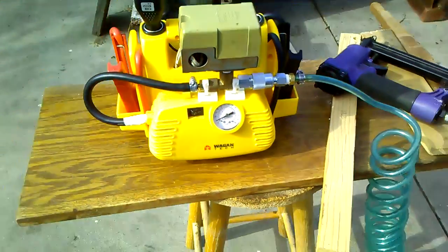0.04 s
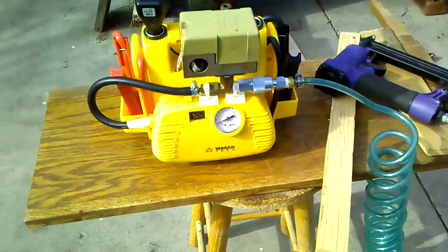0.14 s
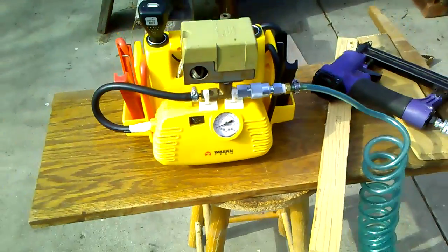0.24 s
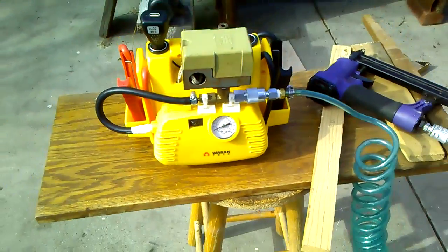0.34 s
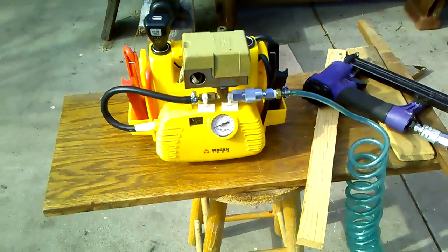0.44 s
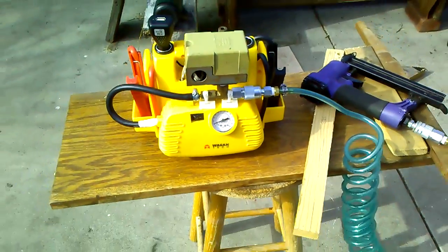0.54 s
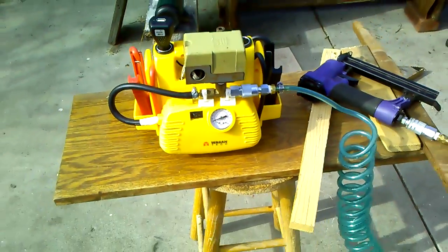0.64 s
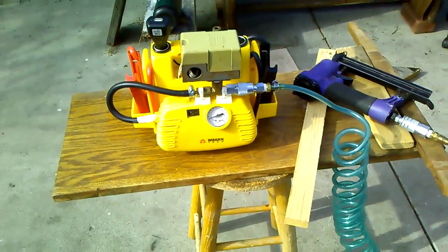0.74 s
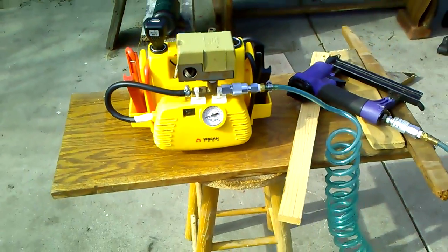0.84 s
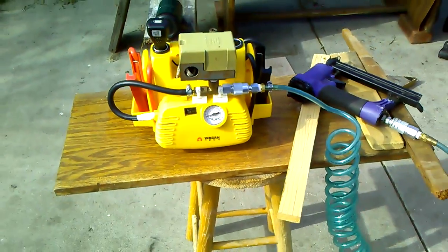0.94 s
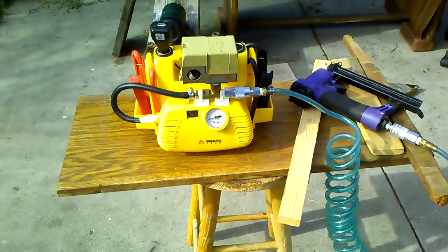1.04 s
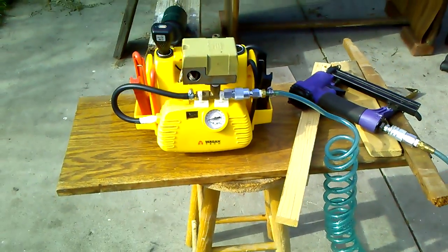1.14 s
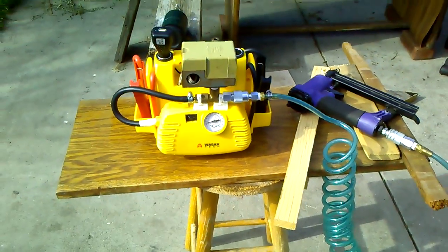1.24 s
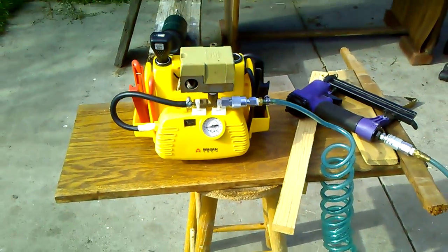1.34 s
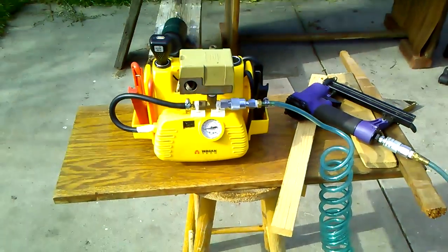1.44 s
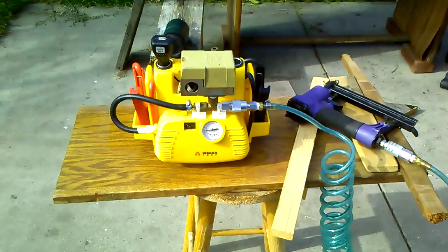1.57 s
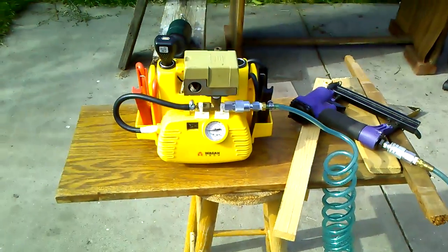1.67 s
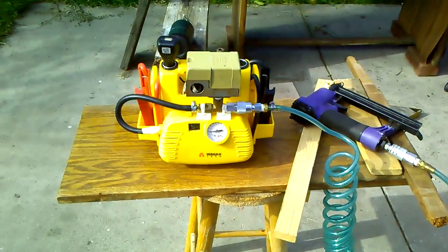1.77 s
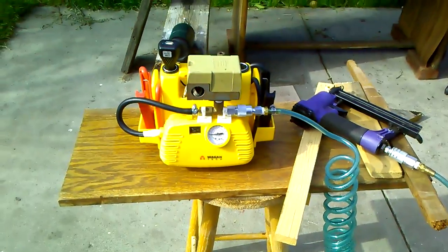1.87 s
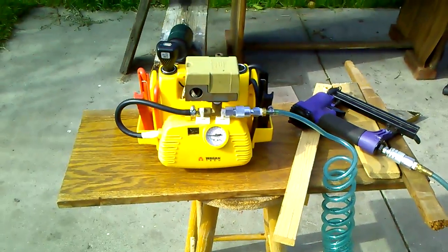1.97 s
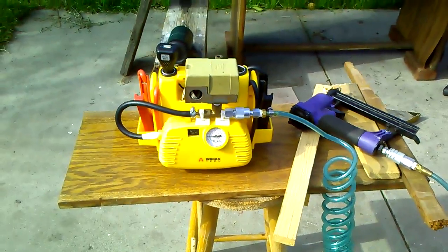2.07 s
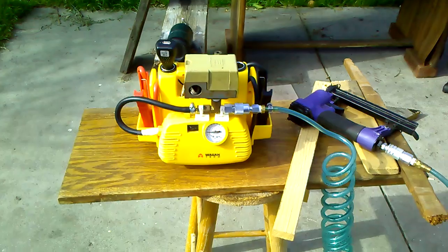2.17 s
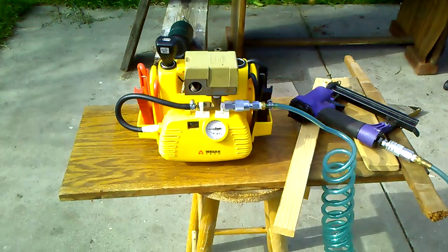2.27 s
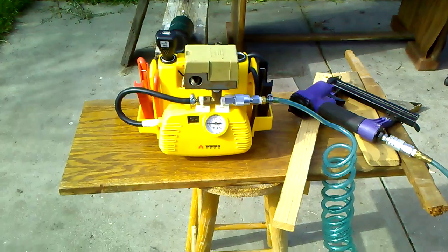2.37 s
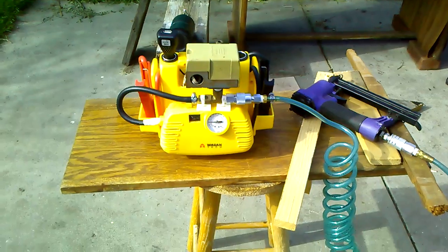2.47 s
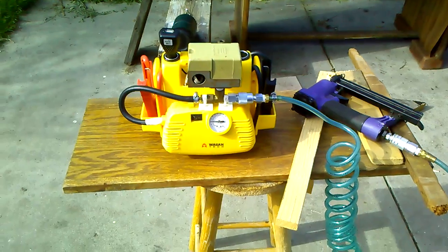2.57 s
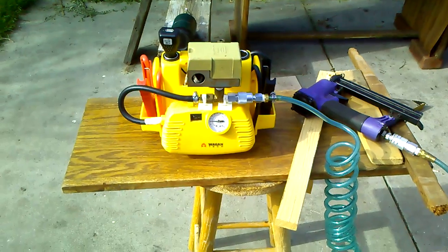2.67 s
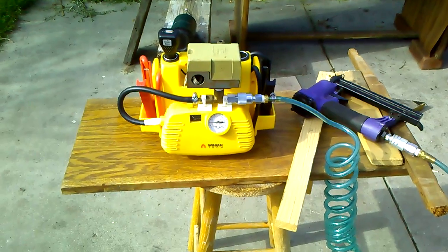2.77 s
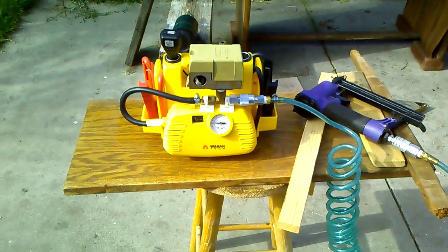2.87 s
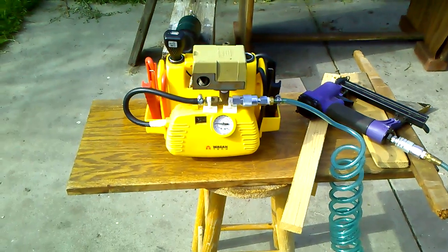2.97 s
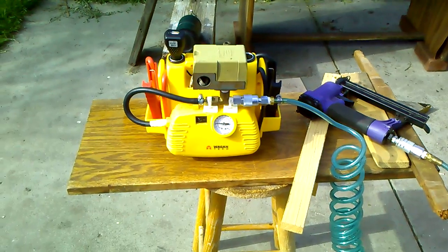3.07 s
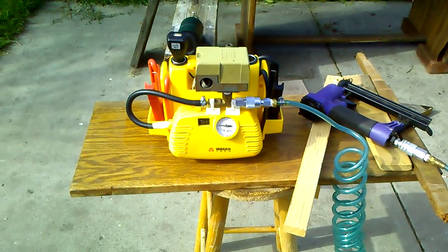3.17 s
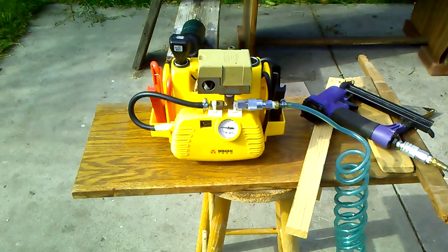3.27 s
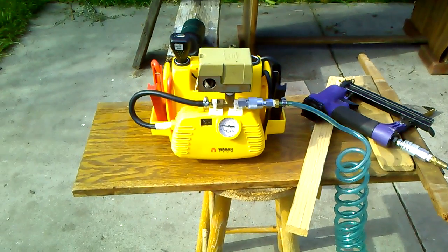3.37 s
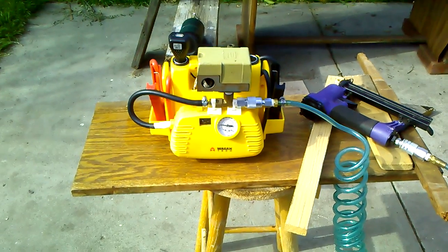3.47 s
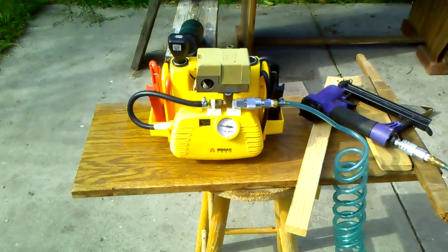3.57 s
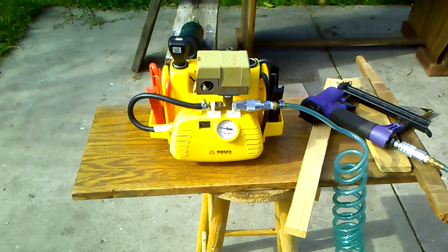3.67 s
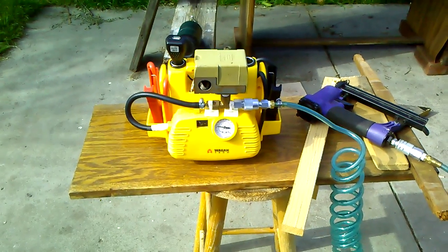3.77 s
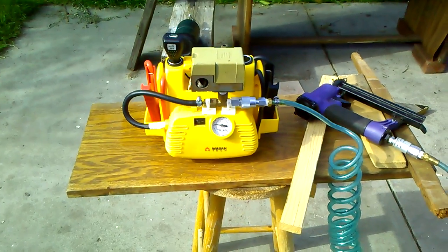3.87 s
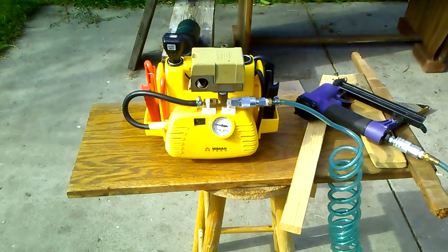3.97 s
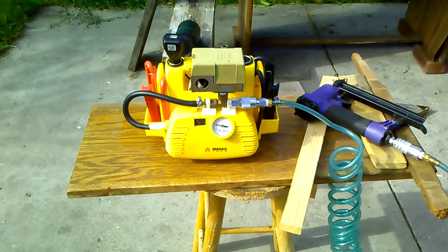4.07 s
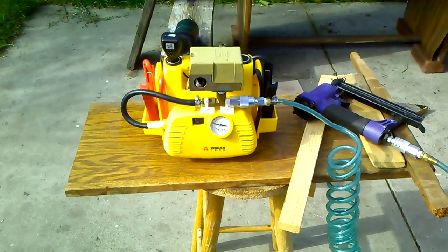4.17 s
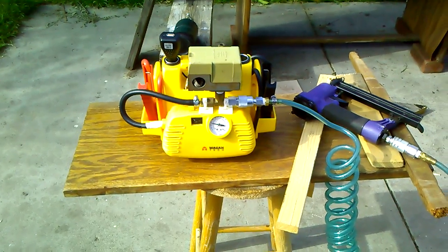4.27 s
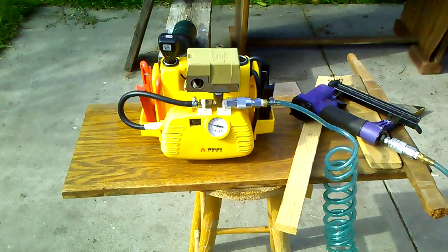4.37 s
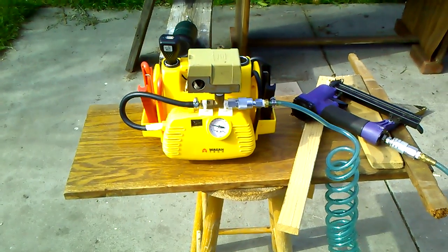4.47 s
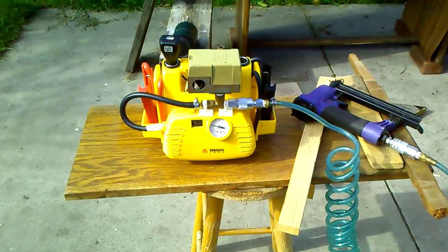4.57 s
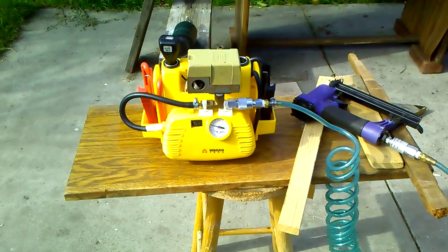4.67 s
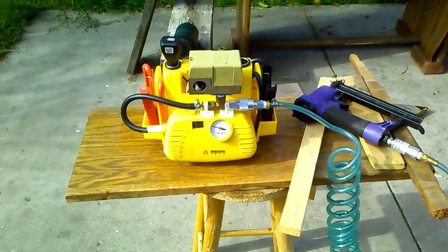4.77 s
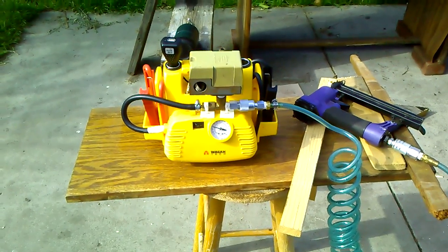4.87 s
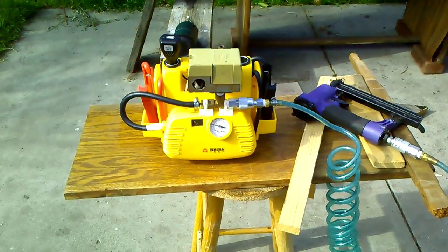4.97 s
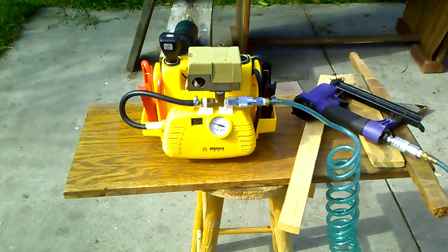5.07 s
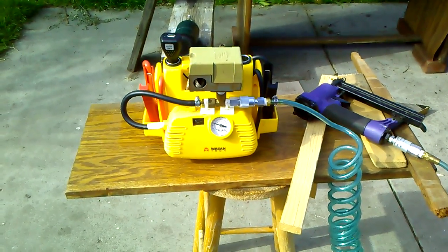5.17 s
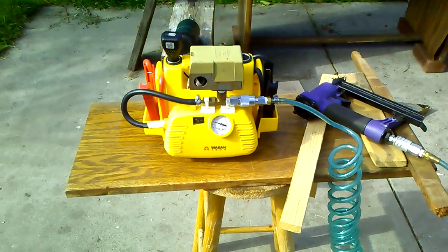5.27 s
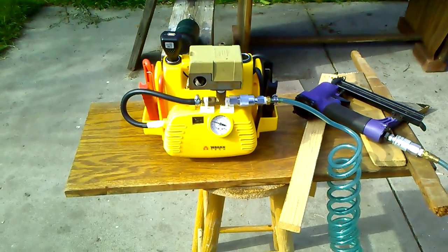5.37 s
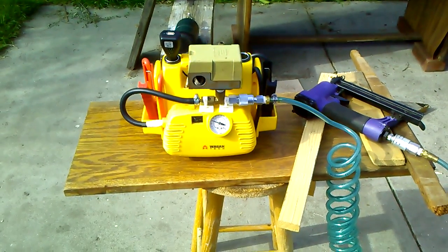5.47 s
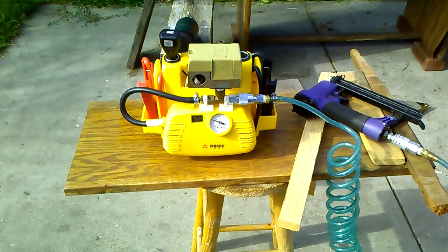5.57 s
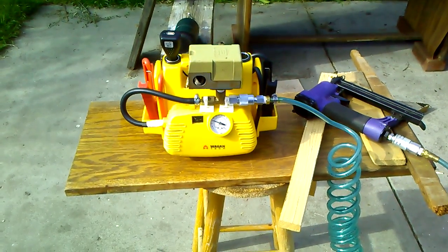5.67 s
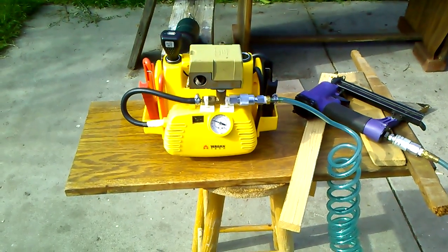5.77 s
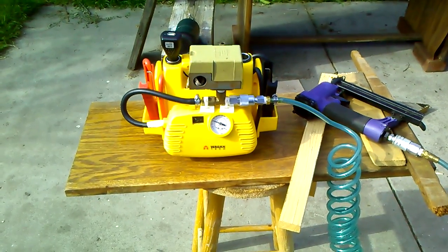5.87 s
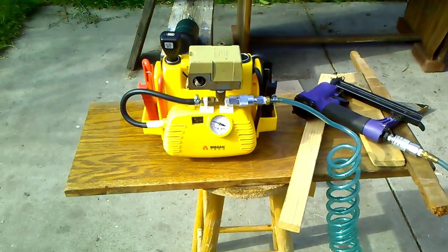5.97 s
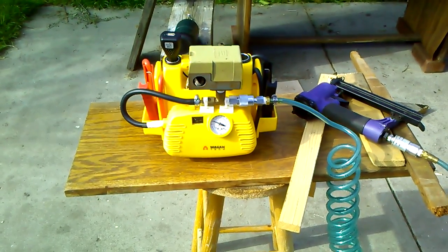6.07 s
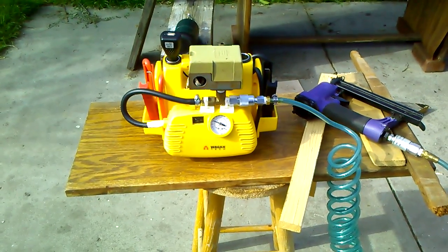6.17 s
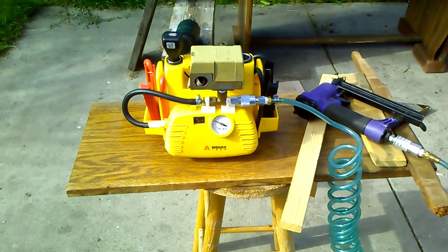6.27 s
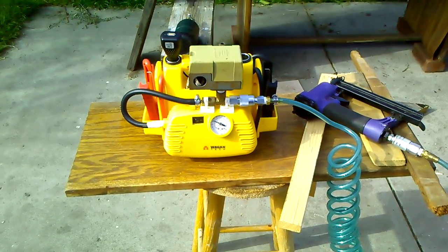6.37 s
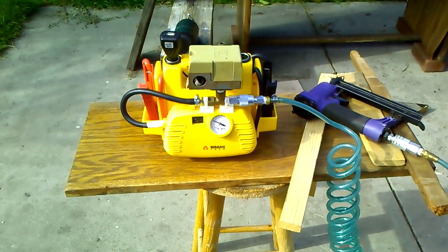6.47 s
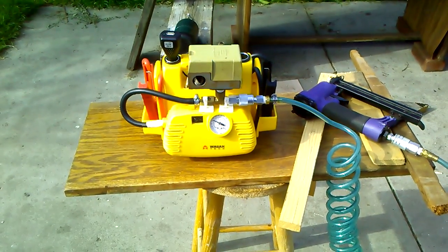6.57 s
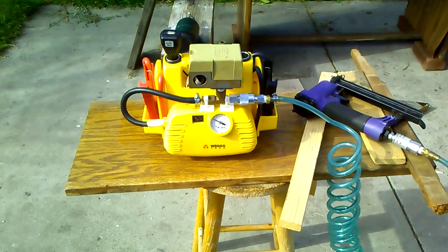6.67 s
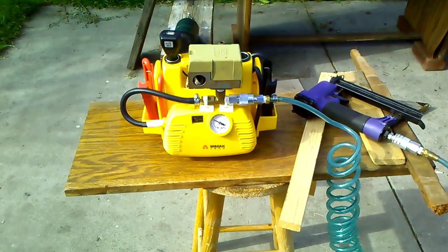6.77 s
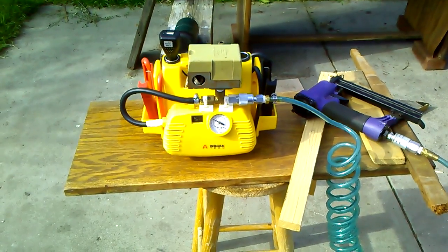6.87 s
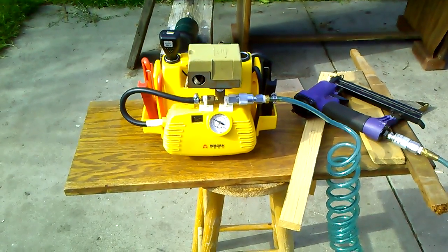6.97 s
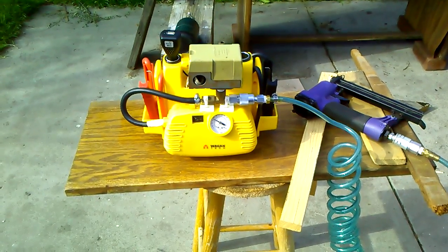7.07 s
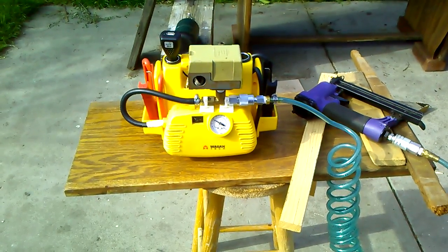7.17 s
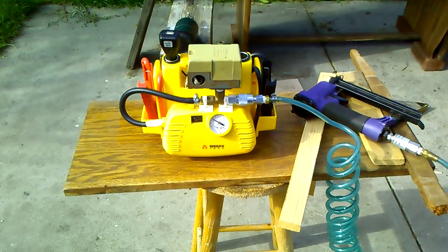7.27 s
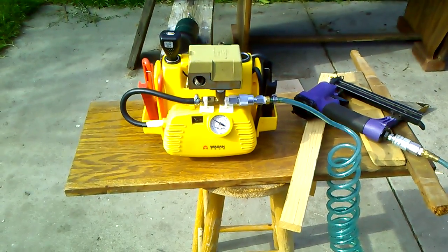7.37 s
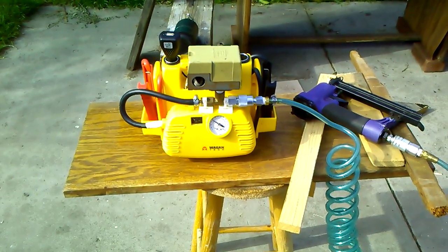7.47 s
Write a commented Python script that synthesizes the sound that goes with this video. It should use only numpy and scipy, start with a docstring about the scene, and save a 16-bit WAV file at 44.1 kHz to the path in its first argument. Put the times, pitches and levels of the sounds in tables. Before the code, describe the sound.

From 0 s a small piston air compressor is in full run, heard close outdoors, a touch louder during the first second as the microphone draws back. Around 45 strokes a second fuse into a harsh, rattling buzz: hard knocks ringing a plastic case, short bright hisses, dry ticks, a squeaky reed near 2 kHz and a nasal honk near 700 Hz. Gear whine and broad fan rush fill underneath, and the strokes throb unevenly about nine times a second. Speed and pitch sink smoothly, fastest early on, to about 40 strokes a second by 7.5 s. The clacks and soft hoot weaken, while the honk ebbs around 2 and 4.6 s and returns stronger near 7 s. Faint low wind bumps occur between 1.6 and 5.7 s, most noticeably near 3.2 s. Concrete adds a short dull reflection. The machine never stops; it is still running at the end.

```python
"""Small piston compressor filling a tank

A geared compressor runs on a board outdoors and slows as its tank fills, over gear drone, fan rush and wind.
Each crank turn gives a puff of noise, the falling squeak of the outlet reed over a soft hoot, a clack of
ringing case modes with a rush of noise and a dry tick, and the low sine honk of the intake reed.
Rising pressure shifts timing, pitch and strength; the gears make strokes throb over about five turns."""
import sys
import numpy as np
from scipy import signal
from scipy.fft import rfft, irfft
from scipy.io import wavfile

SR = 44100
rng = np.random.default_rng(int(sys.argv[2]) if len(sys.argv) > 2 else 0)


def inscribe(sig):
    """Save sig as 16-bit PCM at rate SR to the path in sys.argv[1].

    A 1-D sig is mono; a 2-D sig holds one channel per row.
    Samples are clipped to [-1, 1] before scaling.
    """
    pcm = np.round(np.clip(np.atleast_2d(sig).T, -1, 1) * 32767)
    wavfile.write(sys.argv[1], SR, pcm.astype(np.int16))


N = 332514
TIME = np.arange(N) / SR  # s


def amp(db):
    """Decibels to gain."""
    return 10 ** (np.asarray(db) / 20)


def evened(x):
    """Scales to rms 1."""
    return x / np.sqrt(np.mean(x ** 2) + 1e-20)


def noise(points):
    """Noise of rms 1, its spectrum drawn through points of (frequency [Hz], relative level [dB])."""
    point_hz, point_db = np.transpose(points)
    hz = np.fft.rfftfreq(N, 1 / SR)
    db = np.interp(np.log(hz + 1), np.log(point_hz), point_db)
    return evened(irfft(rfft(rng.standard_normal(N)) * amp(db), N))


def bell(u, width):
    """A smooth hump around zero."""
    return np.exp(-.5 * (u / width) ** 2)


FILL_S = 6.0  # time constant of the filling tank


def under_pressure(pair):
    """Moves from the (tank empty) value towards the (tank full) one, ever more slowly, as pressure builds."""
    empty, full = pair
    return full + (empty - full) * np.exp(-TIME / FILL_S)


def since(turns, place, jitter):
    """Signed turns from the nearest passing of a place, with random slips of rms jitter, and its number."""
    stroke = np.round(turns - place).astype(int)
    slip = jitter * rng.standard_normal(N)[stroke]
    return turns - place - stroke - slip, stroke


def uneven(stroke, spread_db):
    """A random gain for every stroke, of rms spread_db and within narrow limits."""
    draw = rng.uniform(-1, 1, N)[stroke]
    return amp(spread_db * np.sqrt(3) * draw)


# uneven gear load on the strokes: (rate [cycles/turn], first crest [turn])
HONK_BEAT_SLOW, HONK_BEAT_FAST, CLACK_BEAT = (.1988, -.35), (.4034, .3), (.2, 2.35)


def throb(stroke, beat):
    """The gears' uneven load as a slow wave, -1 to 1, over the numbered strokes."""
    cycles_per_turn, crest = beat
    return np.cos(2 * np.pi * cycles_per_turn * (stroke - crest))


def blows(turns, place, jitter, spread_db):
    """One single-sample blow each turn, as the crank passes the place."""
    u, stroke = since(turns, place, jitter)
    passing = np.append(0, (u[:-1] < 0) & (u[1:] >= 0))
    return passing * uneven(stroke, spread_db)


def ring(force, modes):
    """The answer of a body to a force: a sum of decaying sines, of alternating sign."""
    t = np.arange(SR // 20) / SR
    answer = np.zeros(len(t))
    for k, (hz, db, t60) in enumerate(modes):
        answer += (-1) ** k * amp(db - 60 * t / t60) * np.sin(2 * np.pi * hz * t)
    return signal.oaconvolve(force, answer)[:N]


# resonances of pump head and plastic case: (frequency [Hz], relative level [dB], decay t60 [s])
CASE_MODES = [(753, -1.5, 0.016), (1045, -5.5, 0.0069), (1434, -7, 0.024), (1710, -10.5, 0.03),
              (2020, -6, 0.017), (2175, 0.5, 0.012), (2663, -7.5, 0.024), (3274, -11, 0.011),
              (4357, -9, 0.022), (4700, -4, 0.0084), (5420, -4.5, 0.0092), (6070, -1.5, 0.0049),
              (6510, -8, 0.022), (7200, -2.5, 0.0041), (8330, -13, 0.0074), (9140, -12.5, 0.0029),
              (11500, -30, 0.0094), (11900, -11, 0.013), (14700, -15, .008)]


def through_case(x, share):
    """Noise of rms 1, a share (0-1) of whose power has rung the case on its way out."""
    rung = evened(ring(x, CASE_MODES))
    return evened(np.sqrt(1 - share) * x + np.sqrt(share) * rung)


# wind nudging the microphone: (time [s], level [dB])
WIND_BUFFETS = [(1.64, -54), (2.36, -48), (2.44, -48), (3.15, -41), (4.07, -44), (4.73, -48), (5.74, -45)]


def wind():
    """Wind as low noise, swelling from a faint bed into brief soft thumps."""
    gusts = amp(-63) + sum(amp(db) * bell(TIME - s, 0.0097) for s, db in WIND_BUFFETS)
    return gusts * noise([(10, -22), (40, 2), (70, -23), (150, -16), (1000, -70)])


# spectrum of the cooling air: (frequency [Hz], relative level per Hz [dB])
FAN_SPECTRUM = [(25, -8), (110, -8.5), (250, -1.5), (400, -0.5), (550, 7.5), (760, 16), (950, 13),
                (1250, -1.5), (1700, 11.5), (2500, 0.5), (3100, 0.5), (6500, 1), (8600, -7), (11500, -4.5),
                (13500, -11), (15800, -27)]


def fan(turns, clack_db):
    """The motor's cooling air as noise, weakest where the load is greatest, just before the clack."""
    load_db = 1.3 * np.cos(2 * np.pi * (turns - .52))
    fade_db = 0.47 * (clack_db - clack_db.mean())  # weakens along with the clack
    return amp(-30 + fade_db - load_db) * through_case(noise(FAN_SPECTRUM), share=0.22)


# pitches of the gear drone, one per tone: (multiple of the crank speed [1])
GEAR_MULTIPLES = [1, 2, 3, 4, 7, 11.8, 12, 12.8, 13, 13.2, 13.4, 13.8, 14.4, 24, 28]
# their strengths in the same order: (relative level [dB])
GEAR_LEVELS = [-27, -28, -21.5, -21, -20, -6, -2, -6, -8, -6.5, 1, -2.5, 1, -12, -13]


def gears(turns):
    """Shaft and tooth tones locked to the crank, wavering in phase, quietest just after the intake shuts."""
    tones = np.zeros(N)
    for order, db in zip(GEAR_MULTIPLES, GEAR_LEVELS):
        waver = 0.34 * noise([(1, 12), (6, -23), (40, -52), (200, -90)])  # radians
        tones += amp(db) * np.sin(2 * np.pi * (order * turns + rng.random()) + waver)
    load = 1 - 0.28 * np.cos(2 * np.pi * (turns - 0.089))
    return amp(-36.0) * load * tones


# spectrum of the puff: (frequency [Hz], relative level per Hz [dB])
PUFF_SPECTRUM = [(300, -2), (1200, -5), (2300, 2), (3200, 1.5), (4500, 0), (7800, -1), (8500, -5.5),
                 (9200, 3.5), (10000, -5), (10800, -1), (11500, 3), (12300, -14), (13000, -2), (14200, -23)]


def puff(turns, place):
    """A short bright noise hiss as compression starts, with the decaying tick of the intake reed closing."""
    u, stroke = since(turns, place, jitter=.012)
    hiss = uneven(stroke, spread_db=1.96) * bell(u, 0.058)
    tick = amp(-1.5) * uneven(stroke, spread_db=3.0) * (u > 0) * np.exp(-abs(u) / 0.03)
    return amp(-27.5) * (hiss + tick) * through_case(noise(PUFF_SPECTRUM), share=0.03)


def gulp(turns, speed, place):
    """The pump chamber hoots softly as air leaves it, a 640 Hz sine that pressure cushions."""
    u, _ = since(turns, place, jitter=0.0098)
    swell = amp(under_pressure((-22.5, -39.5))) * bell(u, 0.13)
    return swell * np.sin(2 * np.pi * 640 * u / speed)


# resonances of the cylinder wall: (frequency [Hz], relative level [dB], decay t60 [s])
CYLINDER_MODES = [(1440, -2, 0.015), (3430, 1.5, .005), (5240, 2.5, 0.0031)]


def slap(turns, place):
    """Just after the knock the piston rocks against the wall: a dry tick that pressure hardens."""
    db = under_pressure((-25.5, -23.5)) + 0.5 * throb(np.floor(turns), CLACK_BEAT)
    hits = blows(turns, place + .03, jitter=.002, spread_db=3.0)
    return ring(amp(db) * hits, CYLINDER_MODES)


# swing of the intake reed, ahead of its gain: (time [s], level [dB])
HONK_SWING = [(0.1, -22), (0.3, -22.5), (2.13, -25.5), (2.94, -23.5), (4.6, -28.5), (5.34, -23.5),
              (6.96, -21), (7.45, -22)]
HONK_GAIN_DB, HONK_HZ = 10.5, 674.4  # pitch at the crest of the swing
HONK_BEND_HZ, HONK_BEND_TURNS = 59.6, 0.11  # pitch rise, and how far from the crest it is reached


def honk(turns, speed, place):
    """The intake reed swings up in step with the piston as a sine and is shut off quickly."""
    u, stroke = since(turns, place + .012, jitter=.0012)
    db = np.interp(TIME, *np.transpose(HONK_SWING)) + HONK_GAIN_DB
    beats = throb(stroke, HONK_BEAT_SLOW) + throb(stroke, HONK_BEAT_FAST)
    throb_db = under_pressure((1.5, 1)) * beats
    swell = np.where(u < 0, bell(u, 0.083), np.exp(-abs(u / 0.088) ** 2.7))
    # a third, because the phase sums the squared pitch bend
    cycles = (HONK_HZ + HONK_BEND_HZ * (u / HONK_BEND_TURNS) ** 2 / 3) * u / speed
    return amp(db + throb_db) * swell * np.sin(2 * np.pi * cycles)


# outlet reed as (tank empty, tank full): pitch [Hz], fall within a stroke [Hz/turn], overtone boost [dB]
SQUEAK_HZ, SQUEAK_FALL_HZ, OVERTONE_BOOST_DB = (2203, 1862), (200, 2050), (1.5, -5)


def squeak(turns, speed, place):
    """The outlet reed flutters while air is pushed past it; its pitch falls as the flow dies."""
    hz, fall_hz = under_pressure(SQUEAK_HZ), under_pressure(SQUEAK_FALL_HZ)
    u, stroke = since(turns, place, jitter=.0008)
    angle = 2 * np.pi * (hz * u - fall_hz * u ** 2 / 2) / speed
    flutter = angle + 0.33 * noise([(20, 14), (300, 0.5), (1500, -26.5)])  # roughened phase
    undertone = amp(-28) * np.sin(flutter / 2)  # every other swing is a little wider
    overtones = amp(-10.5) * np.sin(2 * flutter) + amp(-14) * np.sin(3 * flutter)
    body = bell(u, 0.082) * (np.sin(flutter) + undertone)
    edge = amp(under_pressure(OVERTONE_BOOST_DB)) * bell(u - .04, 0.089) * overtones
    return amp(-18) * uneven(stroke, spread_db=.5) * (body + edge)


# spectrum of the air rush: (frequency [Hz], relative level per Hz [dB])
RUSH_SPECTRUM = [(200, -19), (600, 1), (1150, -11), (1700, 4.5), (2400, 2), (3100, -0.5), (5300, -2),
                 (7500, -2.5), (8600, -2), (9600, 3.5), (11500, -2), (13500, -8), (15200, -2), (16000, -1)]


def clack(turns, place, db):
    """The piston knocks at its end of travel and rebounds twice, ringing the case; trapped air rushes out."""
    knocks = np.zeros(N)
    for lag, hit_db in [(0, 0), (.075, -1), (.15, -8)]:  # (turns after the knock, dB)
        knocks += amp(hit_db) * blows(turns, place + lag, jitter=.003, spread_db=1.2)
    # pressure hardens the knock within the clack
    knock = amp(under_pressure((-3.5, -2.5))) * ring(knocks, CASE_MODES)

    u, stroke = since(turns, place + .475, jitter=.004)
    age = u + .5  # turns since the seal let go, just ahead of the knock
    gate = (1 - np.exp(-(age / 0.013) ** 2)) * np.exp(-np.maximum(age - .13, 0) / 0.16)
    sputter = amp(1.7 * noise([(100, -26), (1200, 2), (4000, -30)]))
    air = through_case(noise(RUSH_SPECTRUM), share=0.2)
    rush = gate * sputter * uneven(stroke, spread_db=0.4) * air
    return amp(db + 0.6 * throb(stroke, CLACK_BEAT)) * (knock + amp(-3.5) * rush)


def yard(x):
    """A dull bounce off the concrete 11.2 ms late, then a faint short scatter of decaying noise."""
    late = np.interp(TIME - .0112, TIME, x, left=0)
    bounce = signal.lfilter(*signal.butter(1, 1500, fs=SR), late)
    t = np.arange(SR // 4) / SR
    tail = rng.standard_normal(len(t)) * amp(-60 * t / .18) * (t > .004)
    tail = tail / np.linalg.norm(tail)
    tail = signal.lfilter(*signal.butter(1, 3000, "highpass", fs=SR), tail)  # small things scatter no bass
    return x + amp(-15.5) * bounce + amp(-8.5) * signal.oaconvolve(x, tail)[:N]


# crank speed [turns/s] when empty, and its sag when full
FREE_SPEED, SPEED_SAG = 45.744, 7.281
# place of each part in the turn: (tank empty [turns], tank full [turns])
PUFF_AT, SQUEAK_AT, CLACK_AT, HONK_AT = (.155, 0.16), (.362, .372), (.612, .722), (.868, .92)
# pressure cushions the clack as a whole: (tank empty [dB], tank full [dB])
CLACK_DB = (-17, -24.5)
# the microphone starts close and draws back: extra level at first, time constant
CLOSE_DB, DRAW_BACK_S = 1.2, 0.52


def scene():
    """One crank, slowed by the rising pressure, times every part of the machine."""
    speed = under_pressure((FREE_SPEED, FREE_SPEED - SPEED_SAG))
    turns = np.cumsum(speed) / SR
    squeak_at, clack_at = under_pressure(SQUEAK_AT), under_pressure(CLACK_AT)
    clack_db = under_pressure(CLACK_DB)

    pump = puff(turns, under_pressure(PUFF_AT)) + gulp(turns, speed, squeak_at)
    pump += slap(turns, clack_at) + honk(turns, speed, under_pressure(HONK_AT))
    pump += squeak(turns, speed, squeak_at) + clack(turns, clack_at, clack_db)

    machine = fan(turns, clack_db) + gears(turns) + yard(pump)
    nearness = amp(CLOSE_DB * np.exp(-TIME / DRAW_BACK_S))
    return (wind() + nearness * machine)[None]


def record(dry):
    """A steep linear-phase low-pass at 15850 Hz limits the band."""
    lowpass = signal.firwin(511, 15850, window=("kaiser", 9), fs=SR)
    return signal.oaconvolve(dry, lowpass[None], "same")


dry = scene()
out = record(dry)
inscribe(out)
```